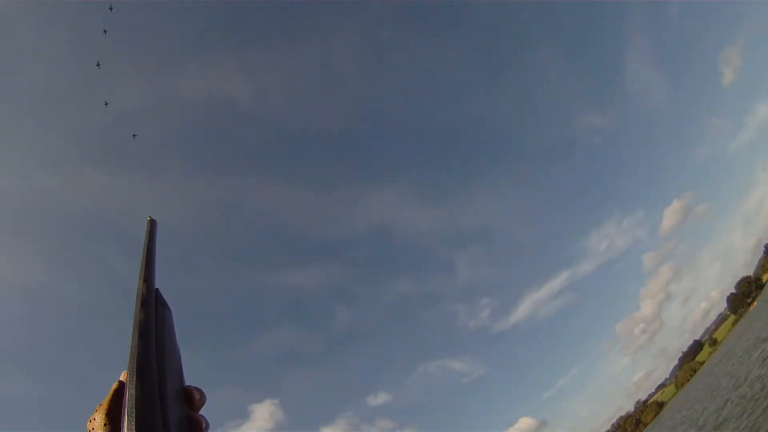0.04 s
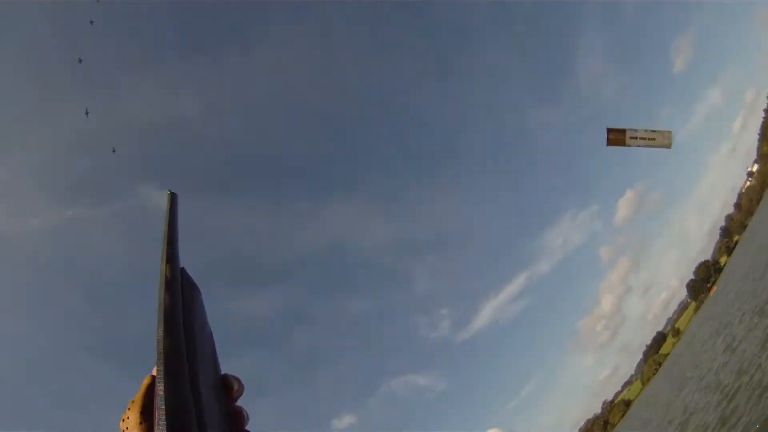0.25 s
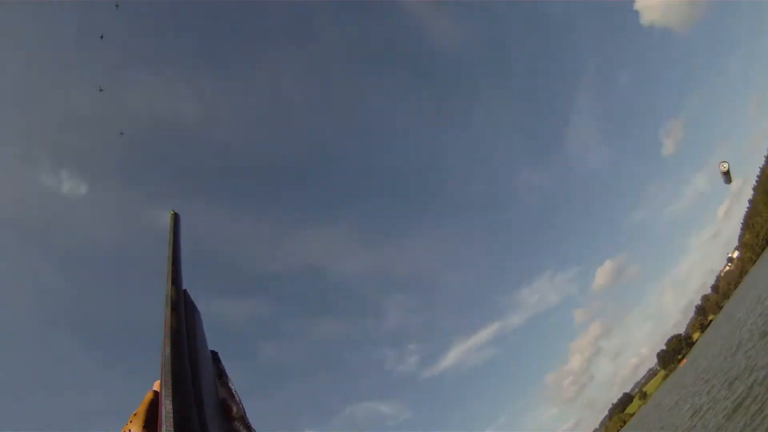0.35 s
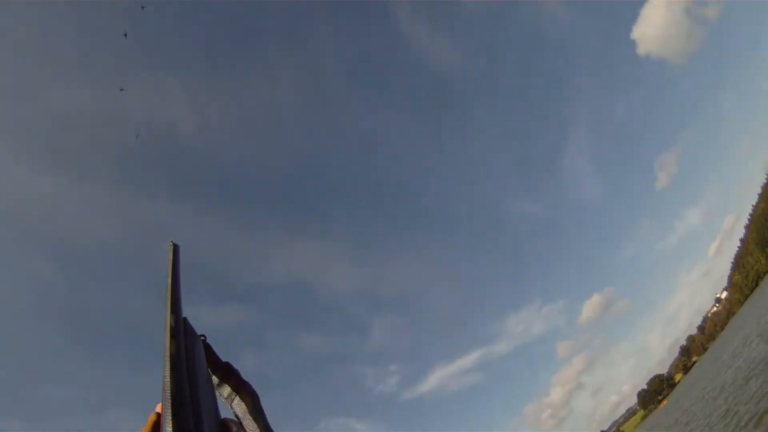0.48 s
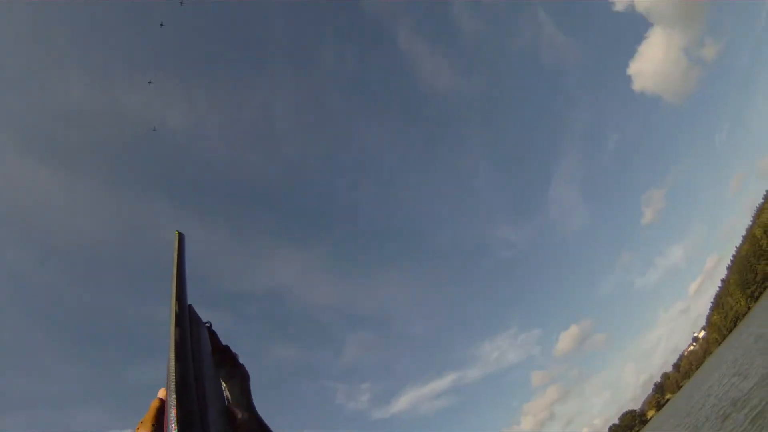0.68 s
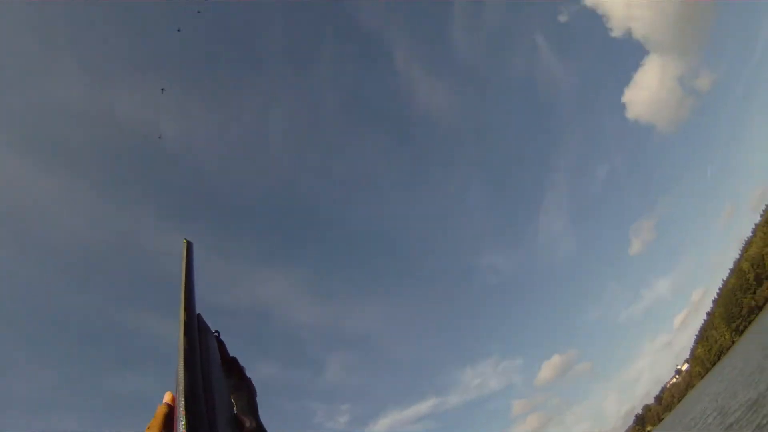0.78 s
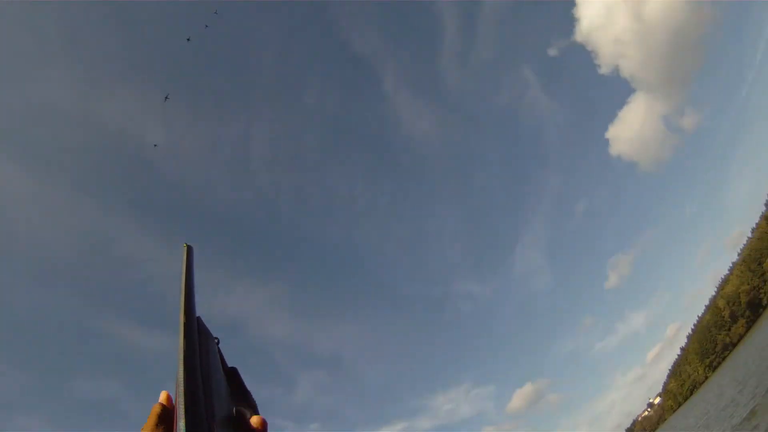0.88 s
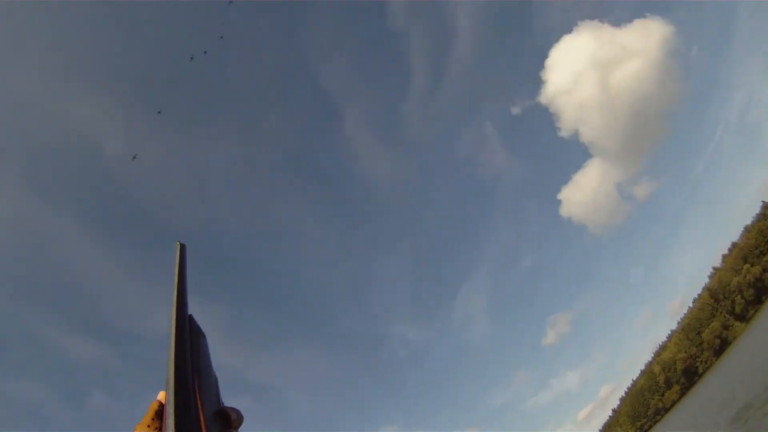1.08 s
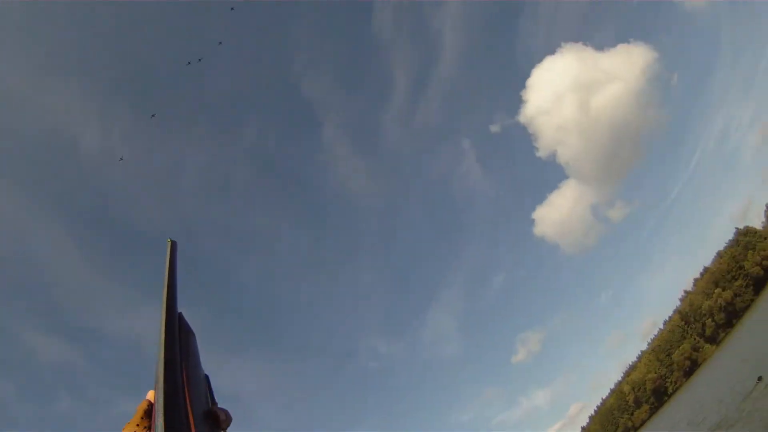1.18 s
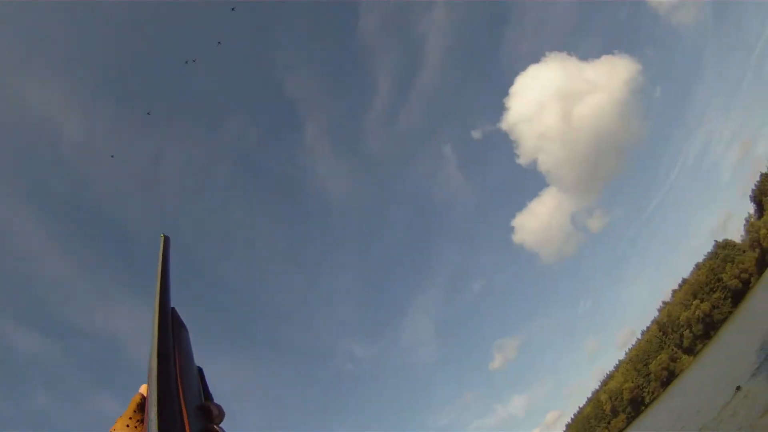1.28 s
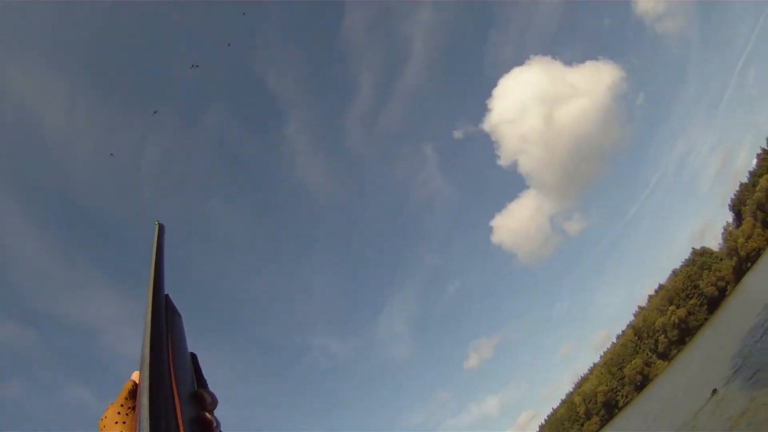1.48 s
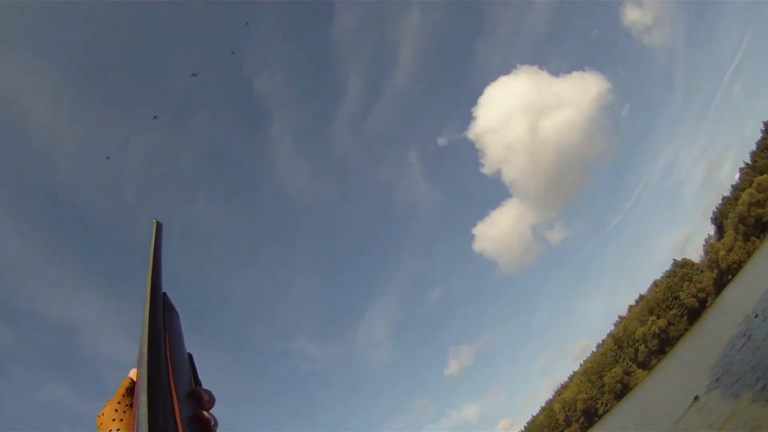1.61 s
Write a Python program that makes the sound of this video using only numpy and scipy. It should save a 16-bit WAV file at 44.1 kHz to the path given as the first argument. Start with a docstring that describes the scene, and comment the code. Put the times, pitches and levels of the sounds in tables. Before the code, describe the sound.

A shotgun blast by a pond, very close to a small microphone. Quiet open-air hush with faint ticks and the last of an earlier echo until 0.22 s, when one sharp, clipped blast hits. Metal action rattles from 0.24 s and slams shut near 0.38 s. Echo with bank slaps rolls, dulling and fading by about 1.1 s. A handling knock lands at 0.54 s; low wind thumps and tiny gun ticks continue to about 1.65 s.

```python
"""By a pond in the open, one shotgun blast goes off next to a small camera and overloads its microphone. The
blast is bursts of shaped noise with steep pressure waves; the action clatters open and slams shut as noise
bursts ringing through steel resonances. The shores return a rolling echo of many small reflections that dulls
as it fades, with distinct slaps off the nearer banks. Gusts rumble and thump on the microphone, the spent shell
knocks as it lands, and the gun ticks faintly in the hands over the open-air hush."""
import sys
import numpy as np
from scipy import signal
from scipy.fft import rfft, irfft
from scipy.io import wavfile
from scipy.ndimage import uniform_filter1d

SR = 44100
rng = np.random.default_rng(int(sys.argv[2]) if len(sys.argv) > 2 else 0)


def transcribe(signal):
    """Save signal, clipped to [-1, 1], as a 16-bit WAV file at the path in sys.argv[1]."""
    frames = np.atleast_2d(signal).T
    limited = np.clip(frames, -1, 1)
    pcm = np.round(limited * 32767).astype(np.int16)
    wavfile.write(sys.argv[1], SR, pcm)


def amplitude_ratio(level_db):
    """Convert a level in decibels to the matching linear amplitude (field) ratio."""
    exponent = np.asarray(level_db, float) / 20
    return 10 ** exponent


N = 72765  # samples

# bursts of roaring gas at the muzzle: (time [s], hold [s], level [dB])
ROAR_BURSTS = [(.2168, .0035, 0), (.2228, .0017, -1), (.2262, .0018, -4), (.2287, .004, -17),
               (.2345, .004, -15), (.2396, .007, -14), (.249, .014, -22), (.266, .013, -18)]
# colour of the gas: (frequency [Hz], density [dB per Hz])
ROAR_COLOUR = [(200, -33.5), (700, 0), (1800, -10), (3000, -2.5), (4300, -4), (5700, -0.5), (8500, -4.5),
               (11000, -2.5), (14700, -17.5), (15900, -13)]
# pressure waves of the blast and its first bounces: (time [s], peak level [dB], length [s])
PRESSURE_WAVES = [(.2214, 1, .00018), (.2249, 0, .00016), (.2322, -8, .0002), (.2336, -3, .00022),
                  (.2353, -9, .00022), (.2367, -7, .00022), (.2200, -5, .0002), (.2270, -20, .0022)]
# steel parts of the action striking: (time [s], level [dB], hold [s], 60 dB decay [s], brightest [Hz])
ACTION_STRIKES = [(.2399, -5, .002, .022, 10000), (.2440, -9, .002, .03, 13000),
                  (.2556, -6, .0005, .015, 11000), (.2500, -17, .004, .04, 11000),
                  (.261, -14, .002, .04, 14000), (.270, -19, .005, .05, 9000), (.278, -15, .004, .06, 7000),
                  (.292, -12, .006, .05, 7000), (.312, -22, .006, .08, 9000), (.335, -18, .003, .04, 8000),
                  (.345, -16, .002, .04, 7000), (.351, -13, .001, .02, 7000), (.355, -18, .002, .02, 13000),
                  (.3778, -2, .0015, .03, 11500), (.3823, -3, .003, .03, 7500),
                  (.3860, -7, .002, .03, 13500), (.3678, -14, .005, .02, 11000),
                  (.3890, -3, .003, .02, 13000), (.4005, -20, .002, .05, 8000)]
# resonances of the steel: (frequency [Hz], width [Hz], level [dB])
STEEL_MODES = [(4240, 860, 0.5), (5200, 400, -13), (7000, 490, -7), (8560, 540, -17), (10690, 500, -5),
               (12900, 1800, -1), (15000, 500, -3.5)]
# echo from the shores: (time [s], level [dB])
ECHO_LEVEL = [(.236, -16), (.25, -20), (.265, -30), (.285, -15.5), (.31, -16.5), (.36, -15), (.42, -19.5),
              (.432, -21), (.456, -23.5), (.49, -26.5), (.514, -29), (.53, -24.5), (.56, -30),
              (.596, -32.5), (.625, -32.5), (.65, -36), (.71, -38.5), (.735, -39), (.83, -39.5),
              (1.0, -45.5), (1.14, -52)]
# colour of the echo at ECHO_COLOUR_S: (frequency [Hz], density [dB per Hz])
ECHO_COLOUR = [(90, -59.5), (170, -30.5), (250, -20.5), (400, -10), (650, -5), (880, -2.5), (1120, -5),
               (1330, -10.5), (1800, -9), (2300, -21.5), (3500, -20.5), (4700, -20), (5600, -27),
               (9000, -37), (14000, -52.5)]
# how the echo's colour drifts on longer paths: (frequency [Hz], change [dB per s], negative = loss)
ECHO_DULLING = [(1000, 9), (1800, -1), (2600, -16.5), (4700, -8), (6000, -21), (9000, -45.5),
                (15000, -57.5)]
# distinct slaps off the nearer banks: (time [s], peak level [dB])
BANK_SLAPS = [(.2785, -12), (.306, -10), (.317, -9), (.362, -11), (.417, -12), (.450, -15), (.462, -16),
              (.5085, -17), (.516, -14)]
# thumps and knocks on the microphone from gusts and handling:
# (time [s], peak level [dB], frequency [Hz], length [cycles])
MIC_THUMPS = [(.5407, -11, 720, 3.4), (.5412, -21, 3600, 11), (1.2058, -25, 430, 3.0),
              (1.6215, -27, 470, 4.6), (1.3228, -19, 680, 3.0), (1.4327, -20, 600, 1.3),
              (1.4427, -20, 600, 1.0), (.455, -24, 200, 1.6), (.769, -27, 120, .9), (.815, -32, 200, 1.3),
              (.864, -29, 150, 1.2), (.877, -32, 170, 1.3), (.887, -27, 200, 1.1), (1.218, -33, 250, 1.6),
              (1.229, -33, 500, 2.6), (1.241, -28, 250, 1.2), (1.365, -31, 300, 1.6),
              (1.378, -32, 350, 1.6), (1.397, -29, 250, 2.6), (1.421, -33, 400, 1.3),
              (1.4305, -29, 180, 1.0), (1.4770, -28, 260, 1.0), (1.4848, -25, 620, 1.8),
              (1.508, -32, 80, 1.1), (1.581, -33, 60, 1.1), (1.607, -28, 90, 1.1), (1.6455, -32, 450, 3.0)]
# wind rumble on the microphone: (time [s], level [dB])
WIND_LEVEL = [(.27, -43), (.44, -59), (.46, -41), (.48, -47), (.73, -52), (.765, -34), (.84, -47.5),
              (.87, -29.5), (.9, -45.5), (1.0, -50), (1.16, -43.5), (1.2, -40.5), (1.24, -32.5),
              (1.26, -66), (1.29, -34), (1.35, -42), (1.4, -36), (1.49, -40.5), (1.55, -42), (1.6, -41),
              (1.65, -38.5)]
# colour of the rumble: (frequency [Hz], density [dB per Hz])
WIND_COLOUR = [(12, -28.5), (22, -2.5), (45, 0.5), (100, -2), (200, -12), (400, -10.5), (650, -20),
               (1500, -47.5), (3000, -100)]
# faint metal ticks of the gun in the hands, and the loud click of the spent shell landing near .54 s: (time
# [s], level [dB], brightest [Hz], 60 dB decay [s])
METAL_TICKS = [(0.017, -50.5, 13000, 0.011), (0.061, -45.5, 7760, 0.0052), (.084, -51, 10700, 0.026),
               (0.156, -58, 8140, 0.016), (0.5397, -19.5, 1880, 0.012), (.5400, -31, 6960, 0.017),
               (0.751, -43.5, 4200, .03), (0.767, -43, 3500, 0.021), (.826, -54, 13000, .03),
               (.861, -49.5, 12000, 0.018), (.902, -46.5, 7300, 0.13), (.910, -54, 13000, 0.11),
               (.957, -47, 8100, 0.16), (1.160, -39.5, 6000, 0.016), (1.187, -48, 11100, 0.016),
               (1.189, -53.5, 7000, 0.089), (1.244, -55.5, 11000, 0.025), (1.268, -52, 3500, 0.029),
               (1.288, -47.5, 9800, 0.018), (1.2905, -44, 2980, 0.01), (1.292, -47, 4500, 0.0047),
               (1.404, -52.5, 5850, 0.024), (1.542, -52, 4730, 0.036)]
# colour of the distant open air: (frequency [Hz], density [dB per Hz])
HUSH_COLOUR = [(150, -40.5), (250, -15), (348, -14), (501, -13), (969, -23.5), (1370, -27), (1940, -15.5),
               (2350, -25), (5230, -30), (13100, -38.5), (15100, -35), (15900, -60.5)]

ROAR_T60_S = 0.003
ECHO_COLOUR_S = 0.63
ARRIVALS_PER_S, ARRIVAL_SPREAD_DB = 12000, 0.5
ROLL_DB = 1.52  # rms depth of the echo's patchy swells
SLAP_HZ, SLAP_CYCLES = 880, 3.6
CALM_DB = -62.5  # rumble before the gusts
LUMPS_DB = 1.5  # rms unevenness of the rumble
BUMPS_PER_S, BUMP_DB, BUMP_SPREAD_DB = 49, -1, 2.5  # BUMP_DB is relative to the rumble level
SKEW, PUSH = 0.42, 0.16  # lopsidedness and one-sided dent of each thump
HUSH_DB = -54
EARLIER_DB, EARLIER_DB_PER_S = -48, -6  # last of the echo of an earlier shot
BASS_CUT_HZ, OVERLOAD_DB, EDGE_HZ = 53, 0.0, 15450


def evened(x):
    """Scales to rms 1."""
    return x / np.sqrt(np.mean(x ** 2) + 1e-20)


def read(points, hz):
    """Reads a spectrum on a log-frequency axis."""
    f, value = np.transpose(points)
    return np.interp(np.log(hz + 1), np.log(f + 1), value)


def level(curve):
    """Gain over time from (time [s], level [dB]) rows."""
    s, db = np.transpose(curve)
    return amplitude_ratio(np.interp(np.arange(N) / SR, s, db))


def colour(x, points):
    """Filters x by a spectrum and scales it to rms 1."""
    hz = np.fft.rfftfreq(len(x), 1 / SR)
    return evened(irfft(rfft(x) * amplitude_ratio(read(points, hz)), len(x)))


def add(mix, s, sound):
    """Mixes sound in at s seconds."""
    part = mix[round(s * SR):][:len(sound)]
    part += sound[:len(part)]


def random_pulses(per_s, spread_db, most):
    """Sparse pulses of either sign at random moments, their dB excess exponential up to a limit."""
    size = amplitude_ratio(spread_db * np.minimum(rng.exponential(1, N), most))
    return (rng.random(N) < per_s / SR) * rng.choice([-1., 1.], N) * size


def thump(hz, cycles):
    """A short lopsided wobble of pressure with no net push, centred 2000 samples in."""
    u = np.arange(-2000, 2000) / SR * hz
    angle = 2 * np.pi * (0.1 - u)
    x = (3.0 * u / cycles) ** 2
    fade = np.exp(-x)
    wobble = fade * (np.sin(angle + SKEW * np.sin(angle + 1)) - PUSH * (1 - 2 * x))
    return wobble - fade * wobble.sum() / fade.sum()


def add_thump(mix, s, db, hz, cycles):
    """Mixes in a thump centred at s seconds."""
    add(mix, s - 2000 / SR, amplitude_ratio(db) * thump(hz, cycles))


def strike(db, hold, t60, hz, octaves, skirt_db, ring_db):
    """A metal knock: a burst of rattle brightest near hz, with the steel ringing in it."""
    t = np.arange(8192) / SR
    f = np.fft.rfftfreq(len(t), 1 / SR)
    bump = np.exp(-0.5 * (np.log2((f + 1) / hz) / octaves) ** 2)
    bump += amplitude_ratio(skirt_db) * f / (f + 3000)  # broad treble beside the bump
    modes = sum(amplitude_ratio(d) / (1 + (2 * (f - m) / w) ** 2) for m, w, d in STEEL_MODES)
    rattle = rfft(rng.standard_normal(len(t))) * bump
    ring = evened(irfft(rattle * modes, len(t)))
    body = evened(irfft(rattle, len(t))) + amplitude_ratio(ring_db) * ring
    fade = np.minimum(t / 0.0001, 1) * amplitude_ratio(db - 60 * np.maximum(t - hold, 0) / t60)
    return evened(body) * fade


def roar():
    """Muzzle gas: coloured noise bursts that rise in half a millisecond, hold, then decay."""
    out, t = np.zeros(N), np.arange(4096) / SR
    for s, hold, db in ROAR_BURSTS:
        fade = np.minimum(t / 0.0005, 1) * amplitude_ratio(db - 60 * np.maximum(t - hold, 0) / ROAR_T60_S)
        add(out, s, fade * colour(rng.standard_normal(len(t)), ROAR_COLOUR))
    return out


def pressure_waves():
    """Blast waves and first bounces: a steep push, then a shallower suction that balances it."""
    out, t = np.zeros(N), np.arange(4096) / SR
    for s, db, length in PRESSURE_WAVES:
        u = t / length
        add(out, s, amplitude_ratio(db) * u * (2 - u) * np.exp(-u) * 2)
    return out


def action_clatter():
    """The bolt and small parts of the gun: broad rattle with strong steel resonances."""
    out = np.zeros(N)
    for s, db, hold, t60, hz in ACTION_STRIKES:
        add(out, s, strike(db, hold, t60, hz, octaves=1, skirt_db=-10, ring_db=-5))
    return out


def shore_echo():
    """Many small reflections of the blast in rolling patches; later ones have lost more treble."""
    arrivals = random_pulses(ARRIVALS_PER_S, ARRIVAL_SPREAD_DB, 3)
    hz, t, z = signal.stft(colour(arrivals, ECHO_COLOUR), SR, nperseg=256)
    # patches smoothed over frequency, then over time
    patches = uniform_filter1d(rng.standard_normal(z.shape), 9, 0)
    rolls = evened(uniform_filter1d(patches, 8, 1))
    dulling = read(ECHO_DULLING, hz)[:, None] * (t - ECHO_COLOUR_S)
    z = z * amplitude_ratio(dulling + ROLL_DB * rolls)
    t = np.arange(N) / SR
    # silent before the first row; falls 30 dB per s after the last
    gate = (t > ECHO_LEVEL[0][0]) * amplitude_ratio(-30 * np.maximum(t - ECHO_LEVEL[-1][0], 0))
    return signal.istft(z, SR, nperseg=256)[1][:N] * level(ECHO_LEVEL) * gate


def bank_slaps():
    """Distinct returns off the nearer banks, each a short wobble of pressure."""
    out = np.zeros(N)
    for s, db in BANK_SLAPS:
        add_thump(out, s, db, SLAP_HZ, SLAP_CYCLES)
    return out


def mic_thumps():
    """Single thumps of air and knocks of handling that push the membrane, and the heavy knock of the spent
    shell landing."""
    out = np.zeros(N)
    for s, db, hz, cycles in MIC_THUMPS:
        add_thump(out, s, db, hz, cycles)
    return out


def wind():
    """Wind on the microphone: lumpy low noise and a patter of small bumps that follows its level."""
    gust = level([(0.0079, CALM_DB)] + list(WIND_LEVEL))
    slow = uniform_filter1d(uniform_filter1d(rng.standard_normal(N), 500), 500)
    lumps = amplitude_ratio(LUMPS_DB * evened(slow))
    out = evened(colour(rng.standard_normal(N), WIND_COLOUR) * lumps) * gust
    for hz in (200, 330, 520):
        bumps = random_pulses(BUMPS_PER_S / 3, BUMP_SPREAD_DB, 2)
        patter = signal.oaconvolve(bumps, thump(hz, 1.18), "same")
        out += amplitude_ratio(BUMP_DB) * gust * patter
    return out


def metal_ticks():
    """The gun shifting in the hands, and the spent shell landing: short narrow-band metal knocks with hardly
    any ringing."""
    out = np.zeros(N)
    for s, db, hz, t60 in METAL_TICKS:
        add(out, s, strike(db, 0.00036, t60, hz, octaves=0.4, skirt_db=-28, ring_db=-41))
    return out


def earlier_echo():
    """Last of an earlier shot's echo: noise dulled by its long path, dying away steadily."""
    dulled = colour(colour(rng.standard_normal(N), ECHO_COLOUR), ECHO_DULLING)
    return amplitude_ratio(EARLIER_DB + EARLIER_DB_PER_S * np.arange(N) / SR) * dulled


def hush():
    """Distant open-air sound: steady coloured noise."""
    return amplitude_ratio(HUSH_DB) * colour(rng.standard_normal(N), HUSH_COLOUR)


def scene():
    """All sources at one microphone, from the gun beside it to the open air far off."""
    gun = roar() + pressure_waves() + action_clatter() + metal_ticks()
    shores = shore_echo() + bank_slaps() + earlier_echo()
    air = mic_thumps() + wind() + hush()
    return (gun + shores + air)[None]


def roll_off(x):
    """The treble ends steeply here."""
    return signal.sosfilt(signal.butter(12, 16040, fs=SR, output="sos"), x)


def record(dry):
    """The microphone loses the deepest bass, its input clips, and the top of the band is cut off."""
    bass_cut = signal.butter(1, BASS_CUT_HZ, "high", fs=SR, output="sos")
    top = amplitude_ratio(OVERLOAD_DB)
    clipped = np.clip(signal.sosfilt(bass_cut, dry), -top, top)
    treble_cut = signal.firwin(511, EDGE_HZ, window=("kaiser", 9), fs=SR)
    mix = signal.oaconvolve(clipped, treble_cut[None], "same")
    return roll_off(mix)


dry = scene()
out = record(dry)
transcribe(out)
```